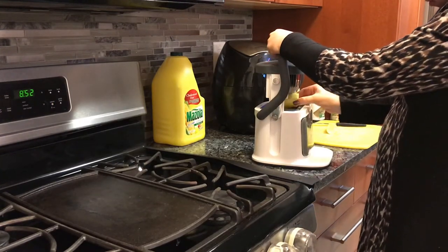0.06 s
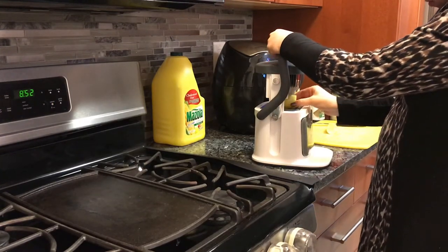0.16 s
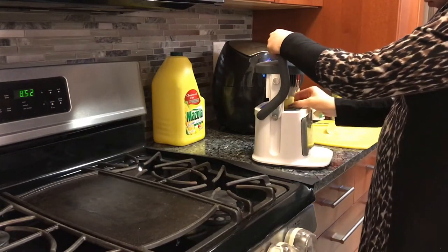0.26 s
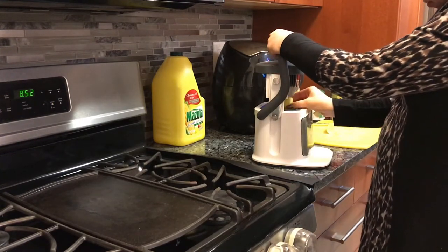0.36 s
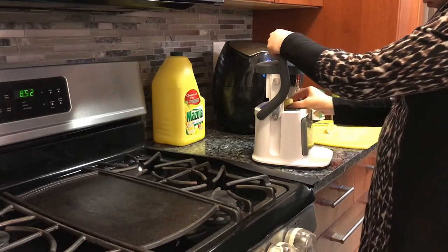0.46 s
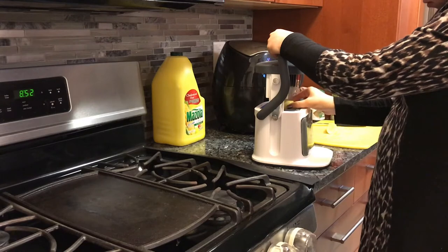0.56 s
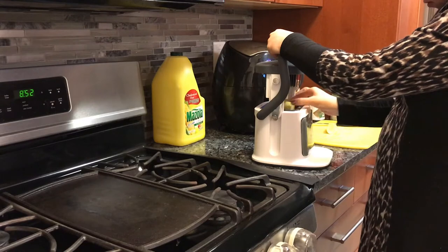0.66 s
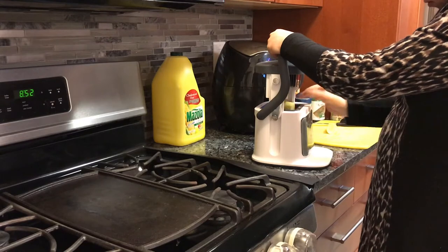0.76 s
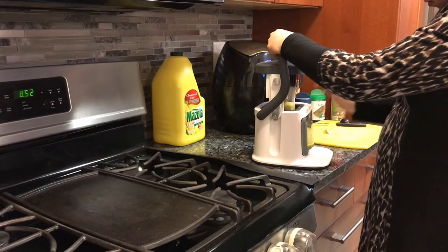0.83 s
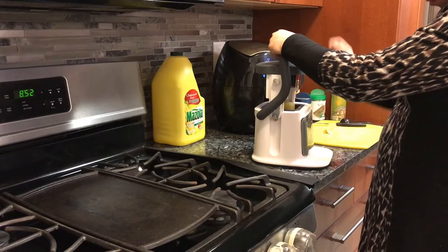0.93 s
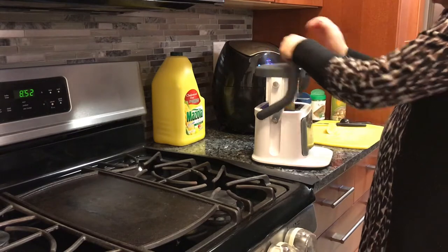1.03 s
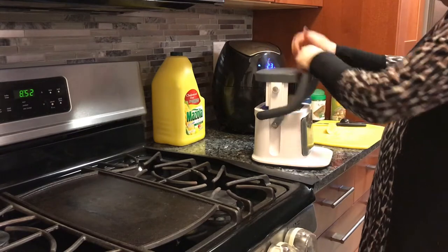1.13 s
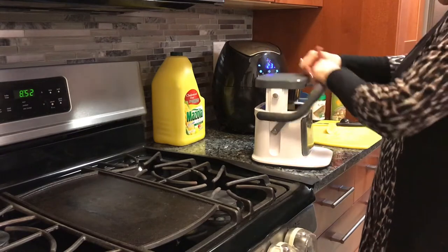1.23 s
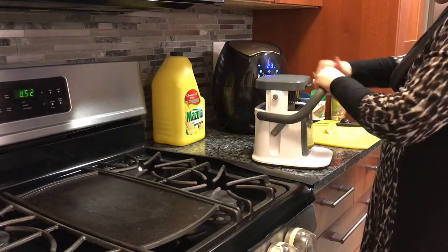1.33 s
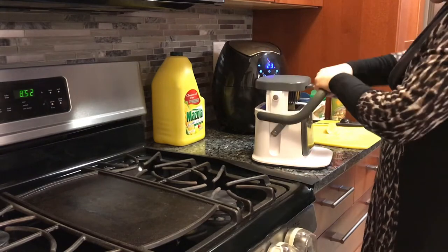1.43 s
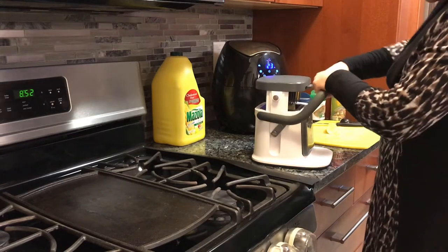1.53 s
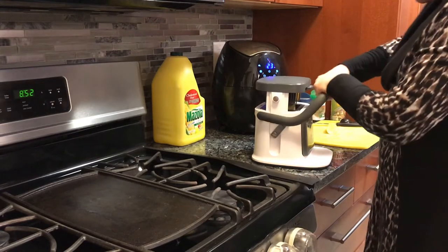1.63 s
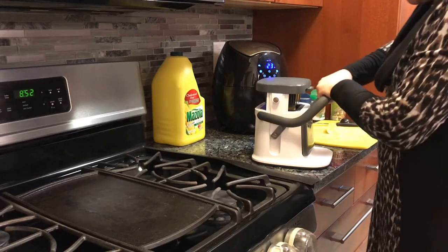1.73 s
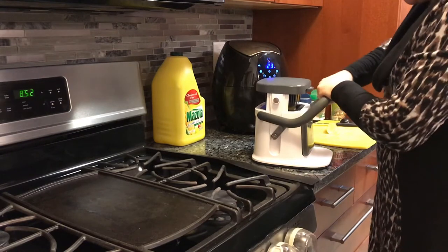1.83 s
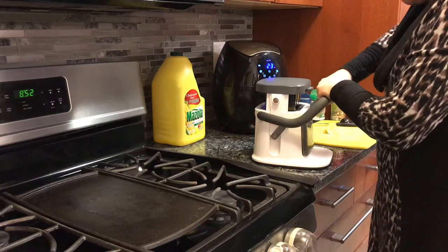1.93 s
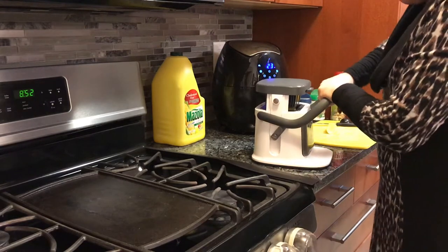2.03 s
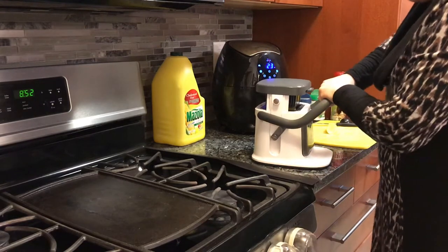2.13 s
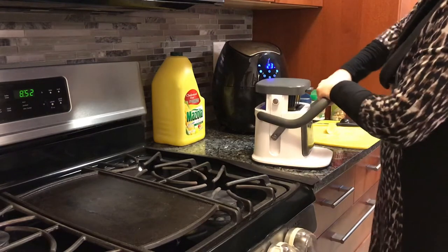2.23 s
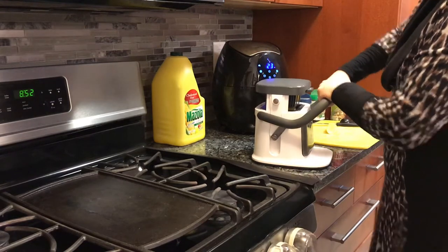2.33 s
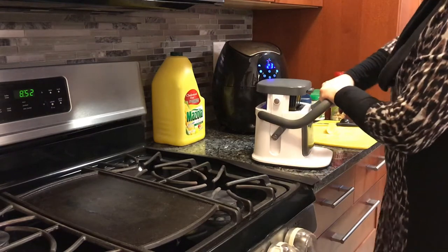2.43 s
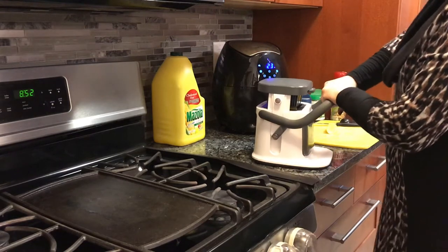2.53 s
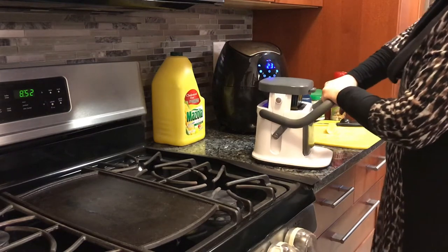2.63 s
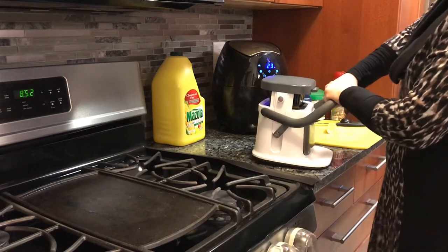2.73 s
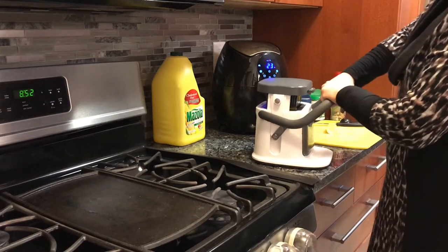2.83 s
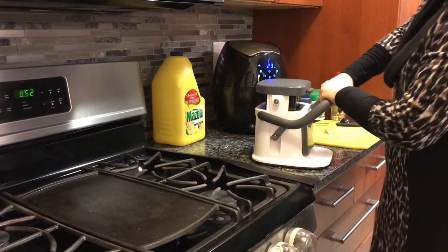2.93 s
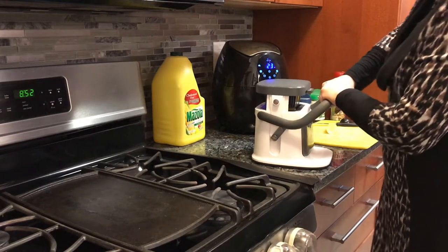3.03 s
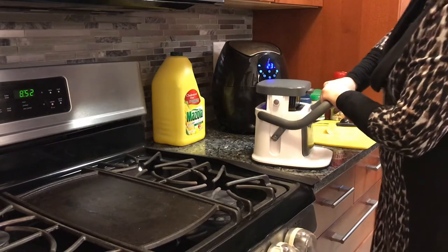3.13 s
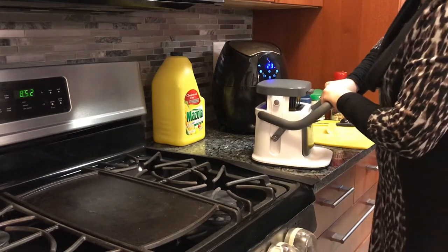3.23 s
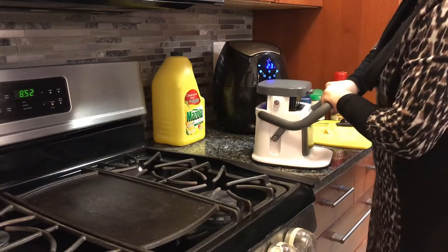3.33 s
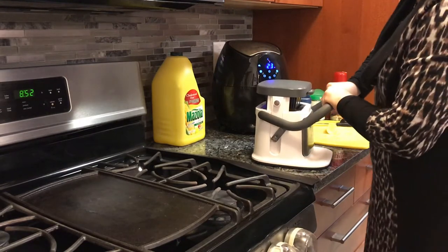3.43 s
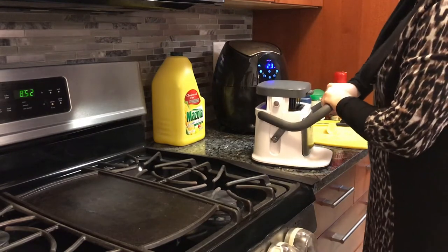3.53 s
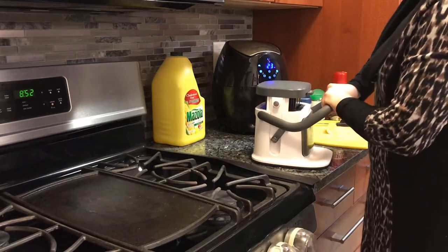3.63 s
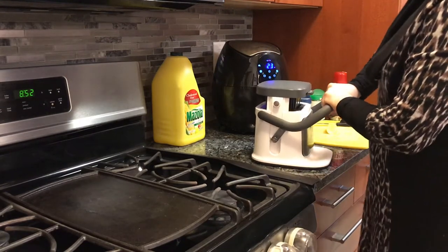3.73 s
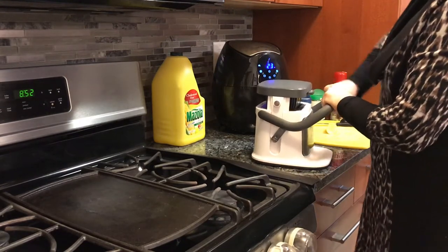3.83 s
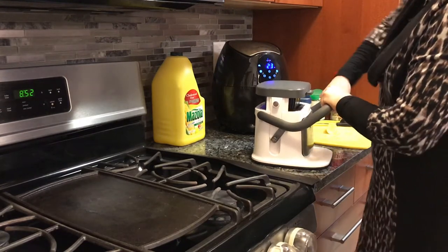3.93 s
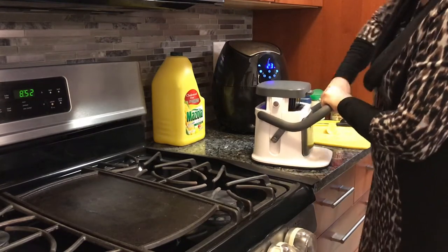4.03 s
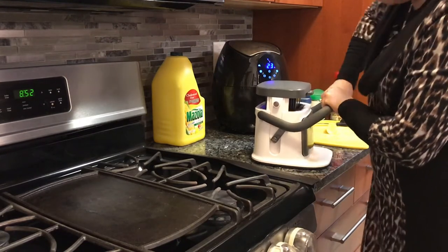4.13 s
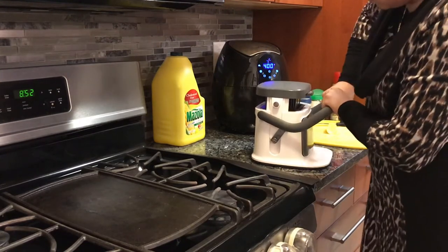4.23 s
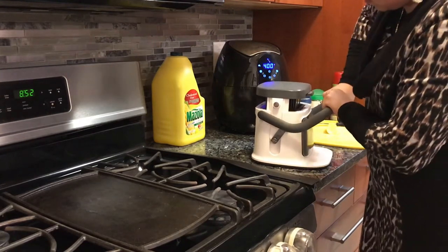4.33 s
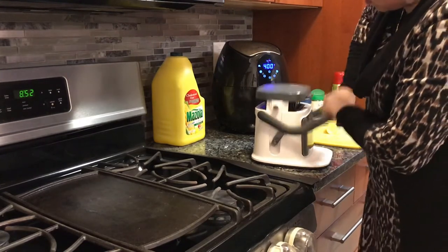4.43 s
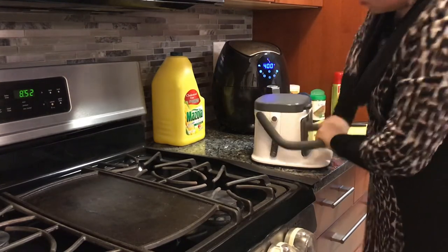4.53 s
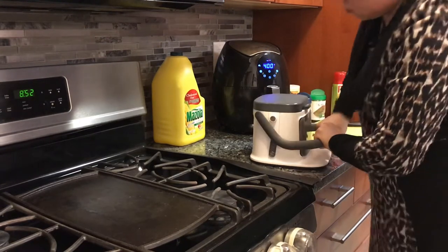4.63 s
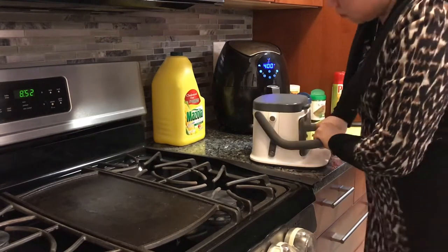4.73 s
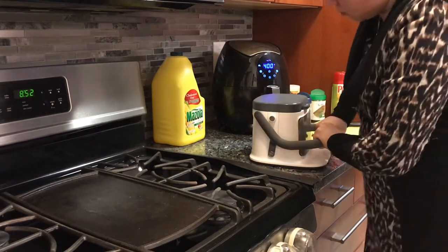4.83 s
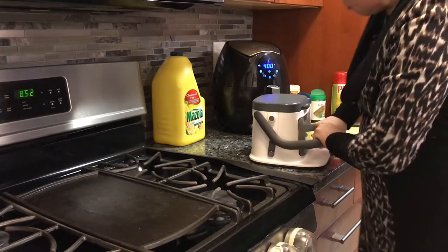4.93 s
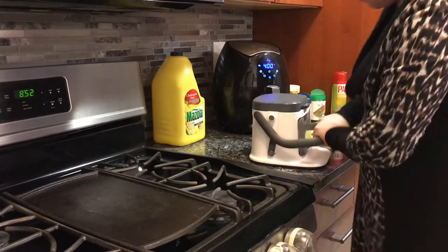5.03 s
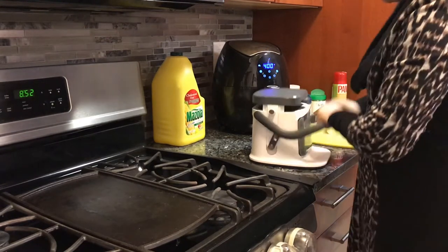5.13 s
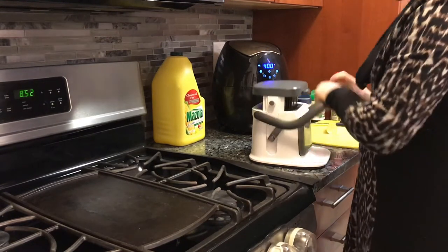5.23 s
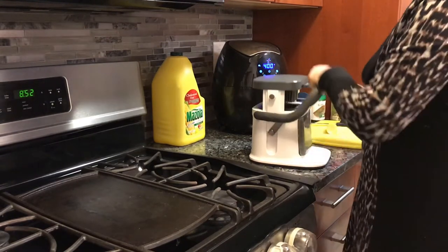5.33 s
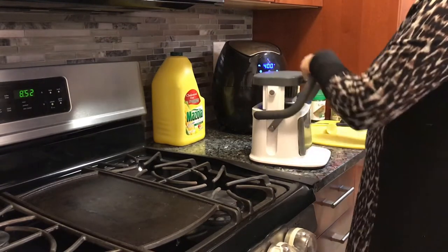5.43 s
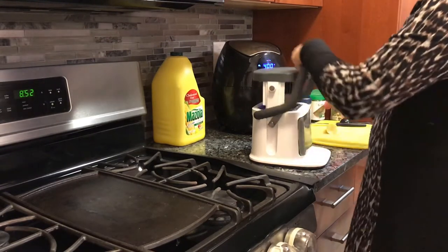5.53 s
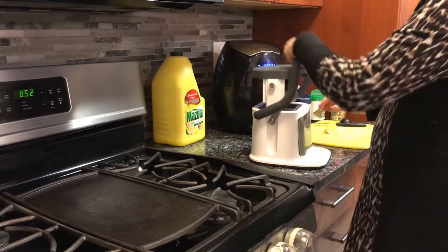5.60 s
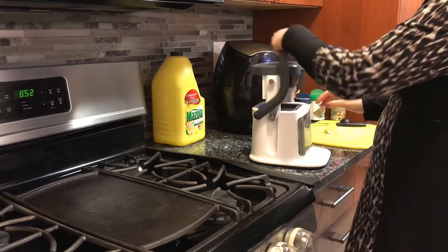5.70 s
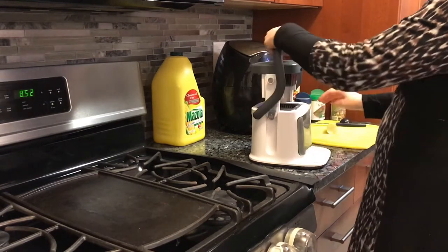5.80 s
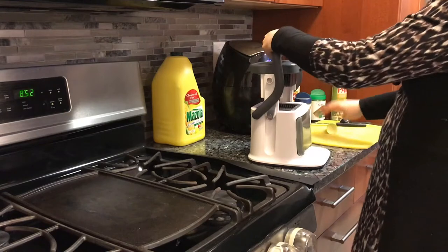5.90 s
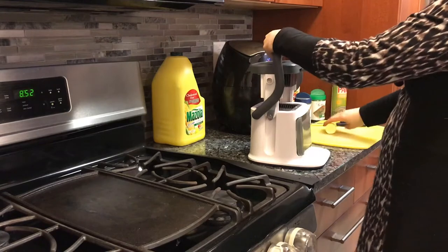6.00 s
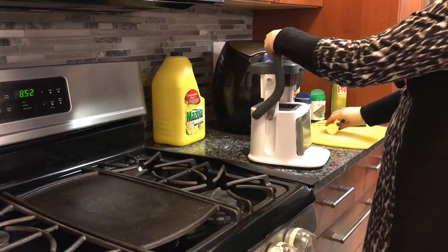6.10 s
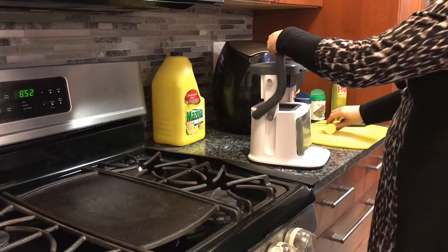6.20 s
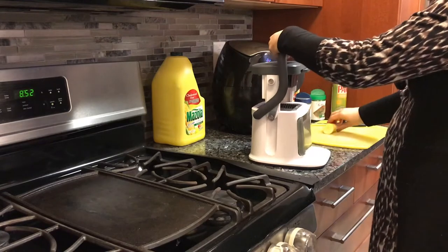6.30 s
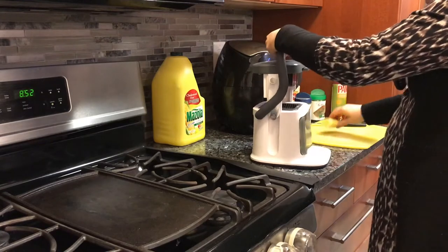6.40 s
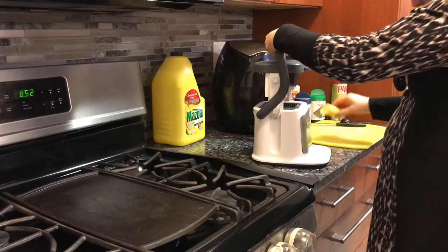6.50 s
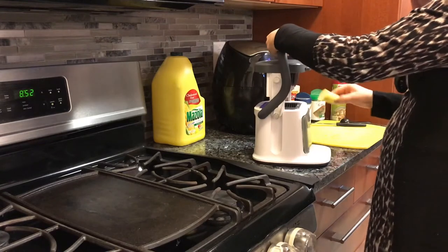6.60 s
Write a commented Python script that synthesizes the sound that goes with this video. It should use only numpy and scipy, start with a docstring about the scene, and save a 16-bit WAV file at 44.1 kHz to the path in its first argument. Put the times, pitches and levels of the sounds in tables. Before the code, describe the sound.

In a small quiet kitchen, a plastic lever chopper on a stone counter slides down with a short rasp and knocks. Sparse creaks and little crunches follow, then denser thuds and cracking as squash is pressed. It judders through the blade grid and slams home loudly, clipping the microphone. The lever lifts with a rattling scrape, a rising squeal and a thin high squeak.

```python
"""A hand-lever chopper on a stone counter presses a piece of squash through its blade grid, in a small quiet kitchen.
The plastic pusher slides down and knocks in its guide: clusters of contacts ring the housing and thud the base.
Bursts of tiny cracks or grating contacts follow, then the squash judders through the grid and the pusher slams home.
The lever is lifted again with a scrape of clumped slips, a stick-slip squeal and squeak, and a last knock.
Beneath lie coloured room air, a low rumble of handling and the faint brush of a sleeve."""
import sys
import numpy as np
from scipy import signal
from scipy.fft import rfft, irfft
from scipy.io import wavfile
from scipy.ndimage import uniform_filter1d

SR = 44100
rng = np.random.default_rng(int(sys.argv[2]) if len(sys.argv) > 2 else 0)


def unload_audio(sound):
    """Save the sound as a 16-bit wav file, at the path given as the first command line argument."""
    columns = np.transpose(np.atleast_2d(sound))
    # keep every value between -1 and 1, then stretch to whole-number steps
    steps = np.round(np.clip(columns, -1, 1) * 32767)
    wavfile.write(sys.argv[1], SR, steps.astype(np.int16))


N = 293706
TIME = np.arange(N) / SR
# Event levels below are relative: the room and the final mix come after them.


def from_db(db):
    """Decibels to amplitude."""
    return 10 ** (np.asarray(db) / 20)


def rms_one(x):
    """Scale to an RMS of 1."""
    return x / np.sqrt(np.mean(x ** 2) + 1e-20)


def noise(size=N):
    """White noise."""
    return rng.standard_normal(size)


def at_hz(points, hz):
    """Read a table of (frequency, value) on a logarithmic frequency axis."""
    table_hz, values = np.array(points).T
    return np.interp(np.log(hz + 1e-9), np.log(table_hz), values)


def cut(x, hz, kind, order=2):
    """Butterworth filter."""
    return signal.sosfilt(signal.butter(order, hz, kind, fs=SR, output="sos"), x)


def colour(x, points, size=1024):
    """Causal (minimum-phase) filter with the given spectrum."""
    magnitude = from_db(at_hz(points, np.fft.rfftfreq(size, 1 / SR)))
    cepstrum = irfft(np.log(magnitude))
    # folding the cepstrum onto positive time makes the phase minimal
    cepstrum[1:size // 2] *= 2
    cepstrum[size // 2 + 1:] = 0
    impulse_response = irfft(np.exp(rfft(cepstrum)))
    return signal.fftconvolve(x, impulse_response)[:len(x)]


def resonate(x, modes, vary_db, detune=0):
    """Parallel resonances; each call draws their proportions and, with detune, small pitch shifts."""
    out = 0
    for k, (hz, width, db) in enumerate(modes):
        r = np.exp(-np.pi * width / SR)
        sign = (-1) ** k
        gain = sign * from_db(db + vary_db * rng.standard_normal()) * (1 - r * r) / 2
        hz = hz * (1 + detune * rng.uniform(-1, 1))
        poles = [1, -2 * r * np.cos(2 * np.pi * hz / SR), r * r]
        out = out + signal.lfilter([gain, 0, -gain], poles, x + 1e-18)
    return out


def grains(per_s, spread_db, size=N):
    """Tiny random snaps of uneven strength and either sign."""
    born = rng.random(size) < per_s / SR
    strength = from_db(spread_db * np.minimum(rng.exponential(1, size), 3))
    return born * strength * rng.choice([-1, 1], size)


def clumps(depth_db, rate_hz, size=N):
    """A gain that wavers at random."""
    wander = rms_one(cut(noise(size), rate_hz, "low")).clip(-2, 2)
    return from_db(depth_db * wander)


SWELL_DB, FADE_IN_DB = 13.5, 31   # how far below their peak a burst and a sustained sound set in


def envelope(t, peak_s, swell_s, hold_s, fade_s, rise_db):
    """Sets in, swells to 1, holds, then dies away."""
    swell_s = max(swell_s, 1e-3)
    started = t >= peak_s - swell_s
    rise = from_db(rise_db * np.clip((t - peak_s) / swell_s, -1, 0)) * started
    return rise * np.exp(-(t - peak_s - hold_s).clip(0) / max(fade_s, 1e-3))


def swelling(s, db, swell_s, hold_s, fade_s):
    """The gain in time of one sustained sound."""
    return from_db(db) * envelope(TIME, s, swell_s, hold_s, fade_s, FADE_IN_DB)


def add(track, start_s, x, db, size):
    """Mix a sound in so that its loudest stretch of `size` samples has the given RMS level."""
    i = round(start_s * SR)
    x = x[:N - i]
    loudest = np.sqrt(uniform_filter1d(x * x, size).max() + 1e-20)
    track[i:i + len(x)] += x * from_db(db) / loudest


# Colour of the kitchen air: (frequency [Hz], gain [dB])
AIR = [(250, -11), (380, 4.5), (460, -5), (600, 3.5), (720, -3.5), (1050, -0.5), (1340, -6), (1550, -2),
       (2200, -13.5), (4400, -25.5), (5200, -30), (7000, -35), (8500, -36), (16000, -49)]
# Background course: (time [s], air level [dB], handling rumble level [dB])
QUIET = [(0, -59.5, -65), (.9, -58, -56), (1.8, -54.5, -56.5), (4.9, -57.5, -60.5), (6.05, -57, -57.5),
         (6.3, -54.5, -51), (6.66, -54, -59)]
# A sleeve brushing past: (time at full level [s], level [dB], swell [s], hold [s], fade [s])
SLEEVE = (6.14, -68, .3, .02, .05)


def background():
    """Steady room air, a lumpy low rumble of handling through loose parts, and a sleeve brushing past."""
    s, air_db, rumble_db = np.transpose(QUIET)
    air = cut(colour(noise(), AIR), 280, "high")
    air = rms_one(air * clumps(depth_db=1.0, rate_hz=11))
    handling = noise() * clumps(depth_db=3.5, rate_hz=16)
    # (frequency [Hz], width [Hz], gain [dB])
    part_modes = [(187.9, 33, 0), (380.0, 27, -5.5), (604, 40, -12), (1000, 170, -18.5)]
    hum_of_parts = resonate(handling, part_modes, vary_db=1.5)
    rumble = rms_one(cut(hum_of_parts, 135, "high", order=3))
    sleeve = rms_one(cut(noise(), 3600, "high", order=1))
    air = air * from_db(np.interp(TIME, s, air_db))
    rumble = rumble * from_db(np.interp(TIME, s, rumble_db))
    return air + rumble + sleeve * swelling(*SLEEVE)


# Resonances of the plastic housing: (frequency [Hz], width [Hz], gain [dB])
HOUSING = [(609, 96, -7), (745, 100, -6), (1035, 117, 1.5), (1221, 250, -2.5), (1525, 150, -2),
           (1685, 150, -2), (1934, 340, -6), (2580, 600, -13), (3370, 340, -17), (4400, 570, -21),
           (6070, 400, -28.5)]


def housing(force):
    """The hollow plastic body rings but radiates little bass."""
    return cut(resonate(force, HOUSING, vary_db=2, detune=.04), 480, "high", order=4)


# lower edge when level and thud are equal, and its rise for each dB less of thud
PRESSED_EDGE_HZ, EDGE_RISE_HZ_PER_DB = 300, 15.5


def pressed(x, db, thud_db):
    """A housing that stands loosely on the counter loses its lower ring."""
    edge_hz = PRESSED_EDGE_HZ + EDGE_RISE_HZ_PER_DB * (db - thud_db)
    return cut(x, np.clip(edge_hz, 100, 2000), "high")


def thump(force):
    """The stone counter answers only in the deep bass."""
    return cut(cut(force, 130, "low"), 25, "high")


# Resonances of the base on the counter: (frequency [Hz], width [Hz], gain [dB])
BASE = [(199, 45, -6), (258, 32, 0.5), (318, 24, -2), (354, 50, -2.5), (428, 70, -1)]


def base(force):
    """The base booms; a weak deep thump passes into the counter."""
    boom = cut(resonate(force, BASE, vary_db=2.5), 195, "high", order=4)
    return cut(boom, 900, "low") + from_db(-38) * thump(force)


def part_ring(force, hz, db, width=.11):
    """The short ring of one plastic part; its pitch may glide, its width is a share of that pitch."""
    hz = hz * np.ones(len(force))
    turn = np.exp(2j * np.pi * np.cumsum(hz) / SR)
    r = np.exp(-np.pi * width * np.median(hz) / SR)
    # shift the pitch down to zero, smooth there, and shift it back
    smoothed = signal.lfilter([1 - r], [1, -r], force / turn + 1e-18)
    rung = 2 * (turn * smoothed).real
    return from_db(db) * cut(rung, [0.69 * hz.min(), min(1.53 * hz.max(), 15000)], "band")


def chatter(t, fade_s):
    """Two surfaces seat against each other in a quick run of tiny contacts."""
    seating = 1 - np.exp(-t / .003)
    return grains(per_s=7300, spread_db=4.0, size=len(t)) * np.exp(-t / fade_s) * seating


# only the hardest blows shake the counter: offset [dB]; growth [dB per dB of thud]
THUMP_DB, THUMP_GROWTH = -1, 2.8
KNOCK_RING_DB, KNOCK_TICK = 7, .25   # gain of the part's ring; strength of the first contact
# Colour of plastic on plastic: (frequency [Hz], gain [dB])
PLASTIC = [(1500, -28.5), (2800, -3), (4200, 4), (5200, 0.5), (6300, -2), (8500, -7), (10000, -10.5),
           (14000, -14), (16000, -11)]
# Plastic parts striking each other:
# (time [s], level [dB], thud level of the base [dB], crack level [dB], ring [Hz])
KNOCKS = [(0.462, -44, -64, -53, 2920), (1.23, -34, -70, -43, 2410), (1.249, -29, -57, -48, 1170),
          (1.266, -23.5, -64, -32, 1200), (1.932, -35, -72, -42, 1310), (2.181, -37, -66, -49, 1950),
          (2.232, -12.5, -64, -21, 1393), (2.983, -40, -58, -53, 1000), (3.042, -25.5, -34, -41.5, 1490),
          (3.066, -25, -27, -46, 616), (3.109, -22.5, -36, -42, 1100), (3.159, -26, -36, -39, 1750),
          (3.231, -19.5, -28.5, -39.5, 1028), (3.351, -21.5, -32, -40, 1055),
          (3.384, -17, -25.5, -39, 1000), (3.467, -30, -38, -43, 1050), (3.624, -11.5, -20, -30.5, 975),
          (3.704, -20.5, -37, -36, 1150), (4.044, -37, -52, -67, 1900), (4.181, -22, -45, -32.5, 1300),
          (4.547, 0.5, -11.5, -15.5, 1045), (4.595, -10.5, -25, -26.5, 990), (4.644, -17, -47, -30, 1030),
          (4.707, -41, -60, -41, 2130), (5.082, -30, -82, -39, 2920), (5.108, -24.5, -78, -36, 2730),
          (5.143, -23, -75, -38, 1360), (5.162, -16, -66, -22.5, 1360), (5.224, -19, -64, -23, 1890),
          (5.349, -18, -58.5, -30, 1750), (5.405, -38.5, -76, -35.5, 2300), (5.431, -34, -76, -39, 1750),
          (5.453, -35, -76, -41, 2680), (5.481, -40, -76, -50, 1200), (5.518, -35.5, -75, -51, 3520),
          (5.802, -30, -51, -41.5, 1499), (6.47, -44.5, -54.5, -53.5, 2550)]


def knocks():
    """A hard contact with a brief chatter; the struck part adds its own short ring to the housing's."""
    out, size = np.zeros(N), 8000
    t = np.arange(size) / SR
    for s, db, thud_db, crack_db, ring_hz in KNOCKS:
        contacts = chatter(t, fade_s=0.0042)
        force = .19 * contacts + KNOCK_TICK * (t == 0)
        # lighter touches are softer and lose their top
        top_hz = np.clip(16000 * from_db(.5 * (crack_db + 37.5)), 3000, 18000)
        body = pressed(housing(force), db, thud_db) + part_ring(force, ring_hz, KNOCK_RING_DB)
        body = cut(body, min(top_hz, 6000), "low")
        crack = cut(colour(contacts, PLASTIC), top_hz, "low", order=4)
        counter = cut(thump(force), 80, "low")
        add(out, s, base(force), thud_db, size=530)
        add(out, s, counter, THUMP_DB + THUMP_GROWTH * thud_db, size=530)
        add(out, s, body, db, size=530)
        add(out, s, crack, crack_db, size=530)
    return out


CREAK_RING_DB, CREAK_FADE_S, CREAK_GLIDE_S = 15, 0.0053, .025
CREAK_TOP_RATIO = 2.5   # upper edge against the ring's pitch
CREAK_TICK_DB = -33   # faint surface noise, against the creak's level
# Short creaks of the loaded plastic: (time [s], level [dB], ring [Hz], glide [octaves per s])
CREAKS = [(0.964, -33.5, 680, -16), (1.117, -40, 635, 0), (1.312, -16.5, 1410, 2), (1.345, -26, 1750, 3),
          (1.39, -27, 1400, 6), (2.245, -18, 1290, 0), (2.29, -29.5, 1280, 2), (2.354, -22, 1303, 3),
          (2.385, -37, 1250, -10), (2.43, -33.5, 1040, -12), (2.456, -38.5, 3340, -3),
          (2.631, -23, 1394, -1), (2.91, -50.5, 2020, 2), (3.061, -24.5, 2500, -89), (3.797, -21, 1700, 1),
          (3.807, -15.5, 1306, 1), (3.956, -36, 2360, -14), (4.045, -33.5, 1000, -16),
          (4.094, -39, 2340, 0), (4.205, -28.5, 1350, -24), (5.175, -12, 1300, 0.5), (5.352, -27.5, 679, 0),
          (5.798, -23, 756, 0)]


def creaks():
    """A soft slip sets one part ringing, with hardly any crack."""
    out, size = np.zeros(N), 8000
    t = np.arange(size) / SR
    for s, db, ring_hz, glide in CREAKS:
        force = chatter(t, CREAK_FADE_S)
        gliding_hz = ring_hz * 2 ** (glide * np.minimum(t, CREAK_GLIDE_S))
        body = cut(housing(force), 0.65 * ring_hz, "high", order=4)
        rung = body + part_ring(force, gliding_hz, CREAK_RING_DB)
        rung = cut(rung, min(CREAK_TOP_RATIO * ring_hz, 15000), "low", order=4)
        add(out, s, rung, db, size=530)
        add(out, s, colour(force, PLASTIC), db + CREAK_TICK_DB, size=530)
    return out


CRUNCH_FADE_S = 0.016   # every burst dies alike
# Colour of the crackle: (frequency [Hz], gain [dB])
CRACKLE = [(1500, -32), (2800, 4.5), (3700, 6), (5200, 0), (6200, -2), (7200, -6), (9000, -7.5),
           (10300, -16), (11500, -11.5), (13000, -18), (15300, -19.5)]
# Bursts of tiny cracks or grating contacts:
# (time of the peak [s], level [dB], thud level of the base [dB], crackle level [dB], swell [s])
CRUNCHES = [(0.971, -32, -46.5, -34, 0.026), (1.309, -15.5, -42, -20.5, .021),
            (1.943, -27.5, -75, -39, .024), (2.046, -21.5, -30, -36.5, 0.012),
            (2.233, -25, -68, -34, 0.034), (2.458, -35.5, -33, -62, 0.026),
            (2.579, -23.5, -34, -35.5, .024), (2.672, -23.5, -43.5, -37, .034),
            (2.726, -35, -57.5, -48, 0.0051), (3.014, -34, -47, -43, 0.033), (3.075, -26.5, -29, -36, .012),
            (3.118, -30, -37.5, -40, .0068), (3.172, -34.5, -32, -39, 0.0066),
            (3.243, -35.5, -33.5, -38, .011), (3.348, -22, -30.5, -33, .024),
            (3.388, -28, -34, -49, 0.0099), (3.489, -22, -26.5, -33.5, .022),
            (3.553, -23.5, -31, -33, .011), (3.63, -23, -32, -30.5, .0085), (3.735, -29.5, -42, -39, .011),
            (3.802, -22, -43.5, -31.5, .022), (4.115, -42, -36.5, -62, 0.027), (4.164, -25, -32, -30, .028),
            (4.19, -27.5, -39, -35, .011), (4.485, -12, -15.5, -18, .015), (4.503, -14, -16.5, -19.5, .011),
            (4.546, -19, -25, -25, .011), (4.574, -15.5, -26, -22.5, 0.0051),
            (5.179, -13.5, -60, -18.5, .01)]


def crunches():
    """A swarm of tiny cracks or grating contacts sets in abruptly, swells and dies, direct and through the body."""
    out, size = np.zeros(N), 12000
    t = np.arange(size) / SR
    for s, db, thud_db, crackle_db, swell in CRUNCHES:
        strength = envelope(t, swell, swell, 0, CRUNCH_FADE_S, SWELL_DB)
        # the strength wavers, so the snaps come in small avalanches
        strength = strength * clumps(depth_db=2.0, rate_hz=250, size=size)
        force = strength * grains(per_s=3000, spread_db=4.2, size=size)
        fine_grains = strength * grains(per_s=7000, spread_db=1.0, size=size)
        start_s = s - swell
        add(out, start_s, base(force), thud_db, size=900)
        add(out, start_s, pressed(housing(force), db, thud_db), db, size=900)
        add(out, start_s, colour(0.58 * force + fine_grains, CRACKLE), crackle_db, size=900)
    return out


SLIDE_RISE_DB, SLIDE_STOP_S = 12, 0.0287   # rise to the fastest moment; fade after the stop
SLIDE_RING_DB, SLIDE_WIDTH = -2, 0.34   # ring of the guide against the rasp; its width as a share of its pitch
# Colour of the rubbing: (frequency [Hz], gain [dB])
RASP = [(600, -16), (1300, 0), (2500, 0), (3400, -3.5), (4400, -3.5), (5200, -11), (6300, -8.5),
        (7400, -12.5), (8600, -13), (10300, -22.5), (16000, -28)]
# The pusher rubs in its guide, down and up again: (start [s], fastest [s], stop [s], level [dB],
# slowing [dB per s], lower edge [Hz], first ring [Hz], last ring [Hz])
SLIDES = [(1.224, 1.338, 1.42, -28, 112, 1300, 1150, 1750),
          (5.085, 5.17, 5.46, -25.5, 46, 1700, 1600, 2350)]


def slides():
    """Wet plastic rasps in clumped slips: it speeds up, slows and stops, and the guide's ring rises."""
    slips = grains(per_s=4000, spread_db=3.5) * clumps(depth_db=3.5, rate_hz=75)
    out, rasp = 0, colour(slips, RASP)
    for start, fastest, stop, db, slowing, edge_hz, first_hz, last_hz in SLIDES:
        levels_db = [db - SLIDE_RISE_DB, db, db - slowing * (stop - fastest)]
        level = np.interp(TIME, [start, fastest, stop], levels_db)
        gain = from_db(level) * (TIME >= start) * np.exp(-(TIME - stop).clip(0) / SLIDE_STOP_S)
        ring_hz = np.interp(TIME, [start, stop], [first_hz, last_hz])
        ring = rms_one(part_ring(slips, ring_hz, 0, SLIDE_WIDTH))
        rub = rms_one(cut(rasp, edge_hz, "high"))
        out = out + gain * (rub + from_db(SLIDE_RING_DB) * ring)
    return out


RUSTLE_FADE_S = 0.024
# Faint bright rustles: (time of the peak [s], level [dB], swell [s])
RUSTLES = [(1.54, -48, 0.023), (1.59, -49, .03), (1.702, -47.5, 0.0044), (2.355, -47.5, .003),
           (2.458, -52, .004), (3.936, -57, .004), (4.118, -56, 0.0051), (5.052, -56.5, .004)]


def rustles():
    """Thin crackle, too light to stir the housing."""
    gain = sum(from_db(db) * envelope(TIME, s, swell, 0, RUSTLE_FADE_S, SWELL_DB)
               for s, db, swell in RUSTLES)
    crackle = colour(grains(per_s=5000, spread_db=2.5), CRACKLE)
    return gain * rms_one(cut(crackle, 5800, "high"))


# thud and crackle levels against the slip; grating against the first snap, and its fade
JUDDER_THUD_DB, JUDDER_CRACKLE_DB, JUDDER_GRATE_DB, JUDDER_FADE_S = -8.5, -13.5, -10, .03
# Resonances of the loaded blade grid: (frequency [Hz], width [Hz], gain [dB])
GRID = [(805, 130, -1.5), (1030, 130, -2), (1750, 170, -1), (2500, 400, -9), (3400, 300, -8)]
# Near the end of the stroke the squash judders through the grid in slips: (time [s], level [dB])
JUDDER_SLIPS = [(4.246, -27), (4.287, -25), (4.337, -24), (4.372, -25), (4.408, -24), (4.437, -24)]


def judder():
    """Each slip snaps the blade grid into a short ring and grates on as it fades."""
    out, size = np.zeros(N), 10000
    t = np.arange(size) / SR
    for s, db in JUDDER_SLIPS:
        grating = grains(per_s=3000, spread_db=3.5, size=size) * np.exp(-t / JUDDER_FADE_S)
        force = chatter(t, fade_s=.004) + from_db(JUDDER_GRATE_DB) * grating
        grid = cut(resonate(force, GRID, vary_db=2.5, detune=0.043), 500, "high")
        add(out, s, grid, db, size=530)
        add(out, s, base(force), db + JUDDER_THUD_DB, size=530)
        add(out, s, colour(force, CRACKLE), db + JUDDER_CRACKLE_DB, size=530)
    return out


def stick_slip(hz, jitter, flutter_db, harmonics_db):
    """Regular slips make a tone whose pitch and strength tremble."""
    pitch = hz * (1 + jitter * rms_one(cut(noise(), 300, "low", order=4)))
    phase = 2 * np.pi * np.cumsum(pitch) / SR
    tone = sum(from_db(h) * np.sin((k + 1) * phase) for k, h in enumerate(harmonics_db))
    return rms_one(tone * clumps(flutter_db, rate_hz=240))


SQUEAK_HZ, SQUEAK_SAG_HZ_PER_S = 4746, 400
# Pitch of the squeal as the pusher is lifted: (time [s], pitch [Hz])
SQUEAL_PITCH = [(5.19, 1597), (5.25, 2143), (5.295, 2206), (5.335, 2350)]
# Swells of squeal and squeak: (time at full level [s], level [dB], swell [s], hold [s], fade [s])
SQUEAL = (5.252, -25.5, 0.06, 0.0448, 0.0477)
SQUEAK = (5.645, -18.5, 0.021, 0.0168, 0.01)


def squeaks():
    """Stick-slip: a rough rising squeal on the way up, and a clean sagging squeak near the top."""
    rising_hz = np.interp(TIME, *np.transpose(SQUEAL_PITCH))
    squeal = stick_slip(rising_hz, jitter=.018, flutter_db=5, harmonics_db=[0, -8, -12, -19])
    sagging_hz = SQUEAK_HZ - SQUEAK_SAG_HZ_PER_S * (TIME - SQUEAK[0])
    squeak = stick_slip(sagging_hz, jitter=.002, flutter_db=.2, harmonics_db=[0, -14, -21])
    return swelling(*SQUEAL) * squeal + swelling(*SQUEAK) * squeak


WALL_ECHO_S, WALL_SMEAR_S = .015, .006
# Reverberation time of the kitchen: (frequency [Hz], time to fall by 60 dB [s])
ROOM_T60 = [(200, 0.18), (1000, 0.19), (4000, 0.2), (15000, 0.16)]


def kitchen(x, wet_db, wall_db):
    """The tiled wall and cupboards return a smeared echo, within a short diffuse tail."""
    size = 20000
    t = np.arange(size) / SR
    edges = np.geomspace(100, 18000, 9)
    tail = 0
    for lo, hi in zip(edges, edges[1:]):
        decay = from_db(-60 * t / at_hz(ROOM_T60, np.sqrt(lo * hi)))
        tail = tail + cut(noise(size), [lo, hi], "band") * decay
    # the tail builds up after the first 4 ms
    tail = tail * np.clip((t - .004) / 0.0082, 0, 1)
    wall = noise(size) * np.exp(-t / WALL_SMEAR_S) * (t > WALL_ECHO_S)
    tail = from_db(wet_db) * tail / np.linalg.norm(tail)
    wall = from_db(wall_db) * wall / np.linalg.norm(wall)
    return x + signal.fftconvolve(x, tail + wall)[:N]


def scene():
    """The chopper in the kitchen, over the background."""
    chopper = knocks() + creaks() + crunches() + slides() + rustles() + judder() + squeaks()
    in_room = kitchen(chopper, wet_db=-9, wall_db=-11)
    return (from_db(-1.2) * in_room + background())[None]


CUTOFF_HZ = 15900


def record(dry):
    """The slam overloads the microphone, which clips hard; a steep filter cuts the top."""
    clipped = np.clip(dry, -1, 1)
    return signal.sosfilt(signal.ellip(10, .1, 80, CUTOFF_HZ, fs=SR, output="sos"), clipped)


dry = scene()
out = record(dry)
unload_audio(out)
```